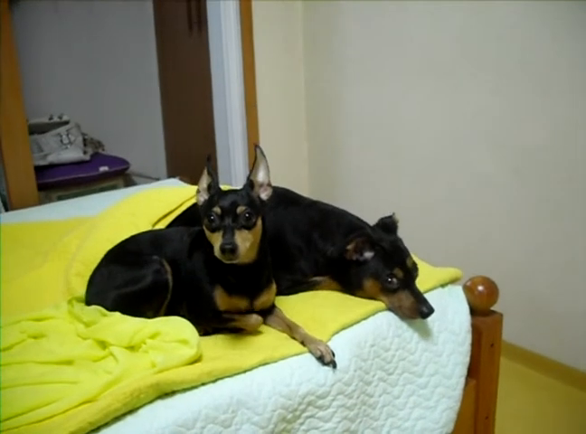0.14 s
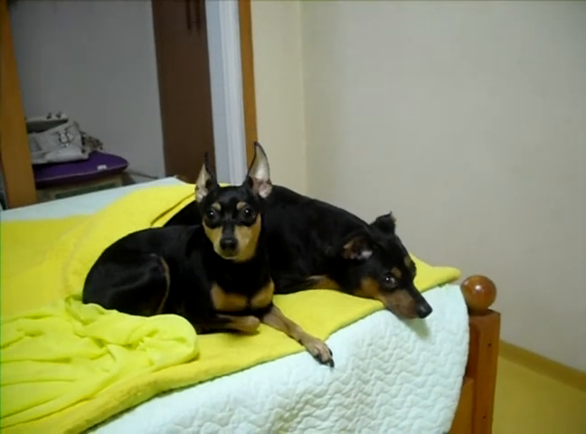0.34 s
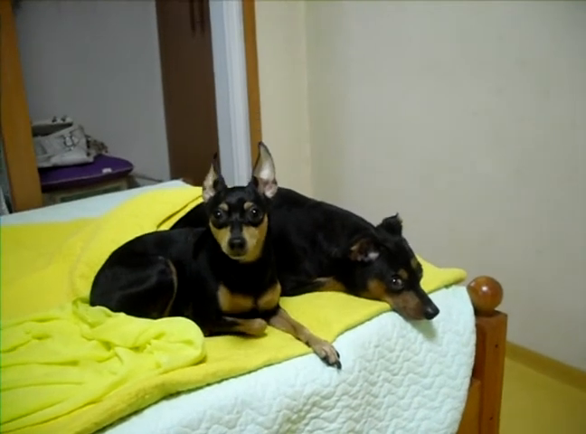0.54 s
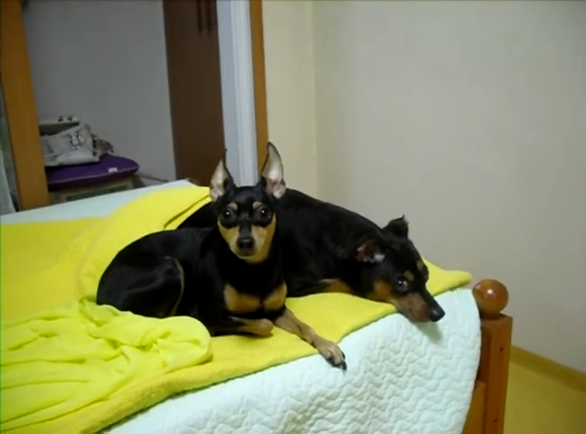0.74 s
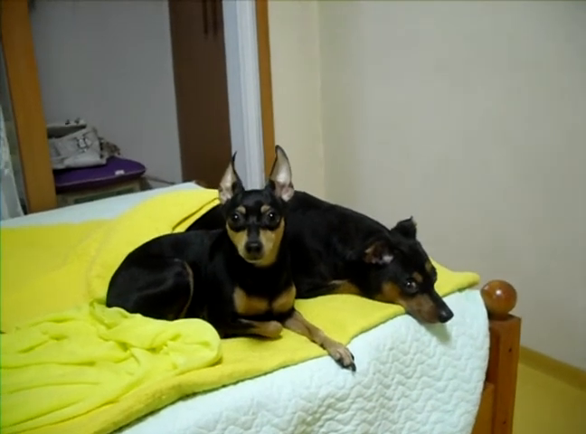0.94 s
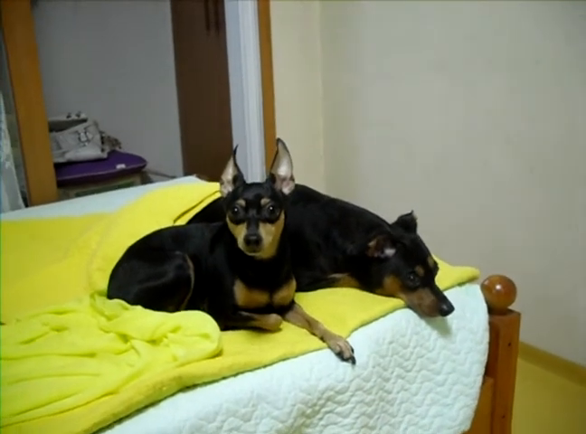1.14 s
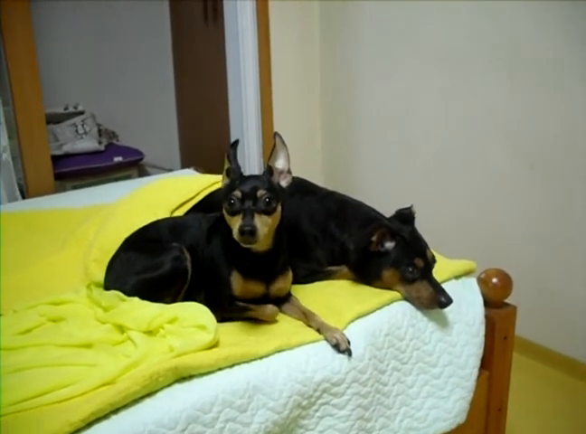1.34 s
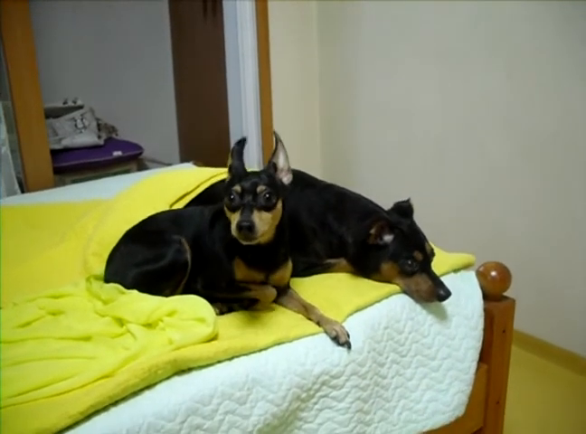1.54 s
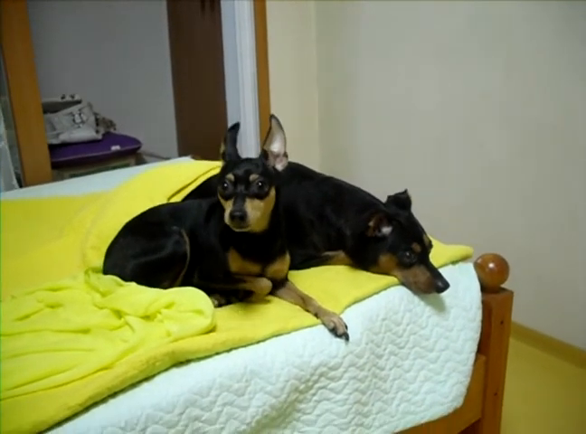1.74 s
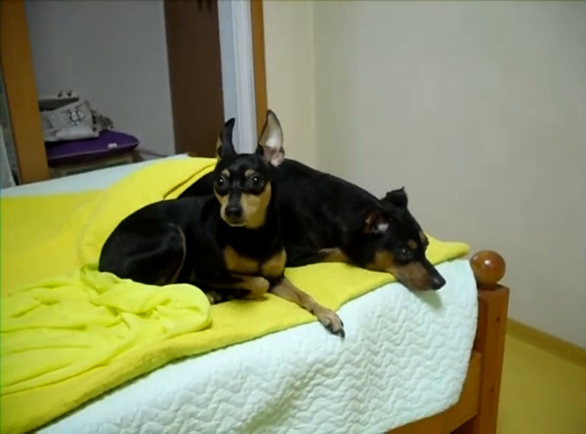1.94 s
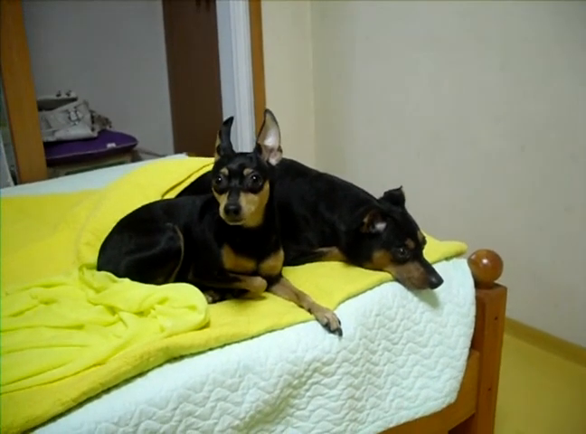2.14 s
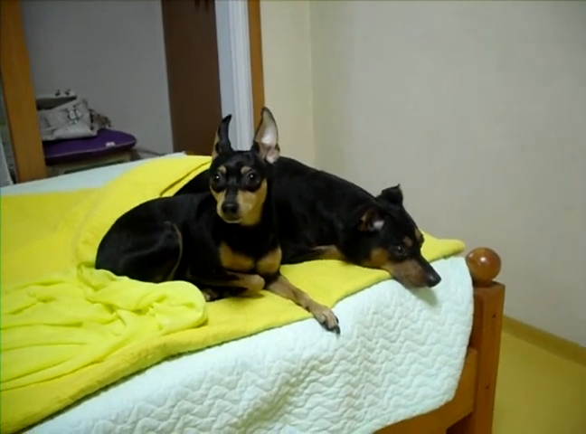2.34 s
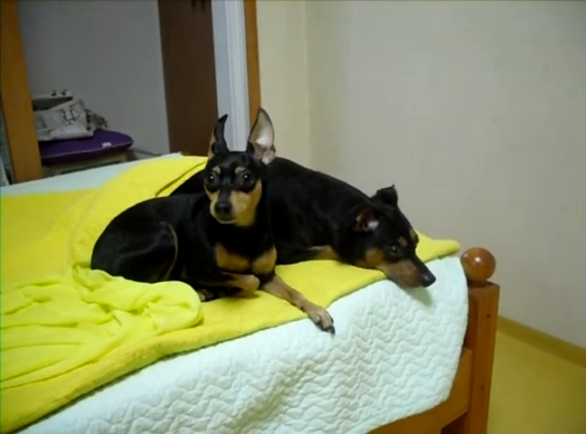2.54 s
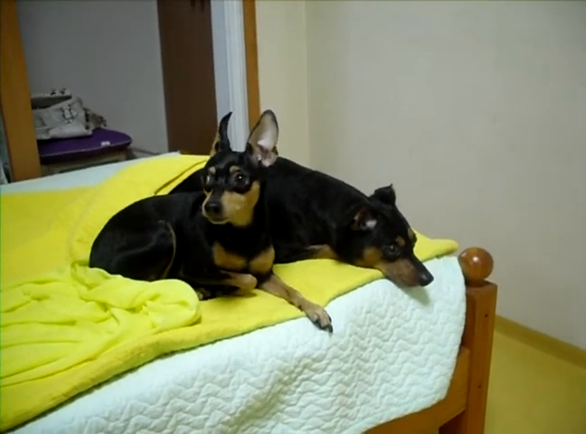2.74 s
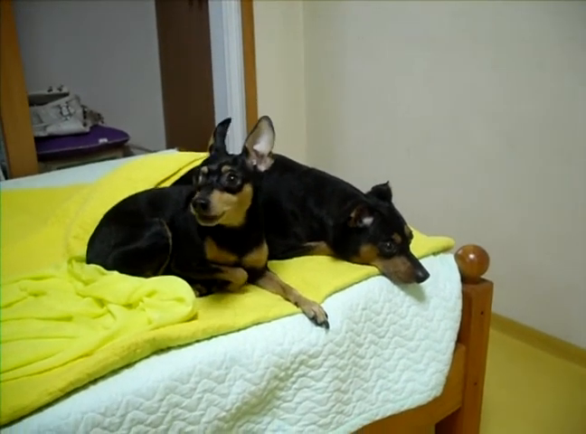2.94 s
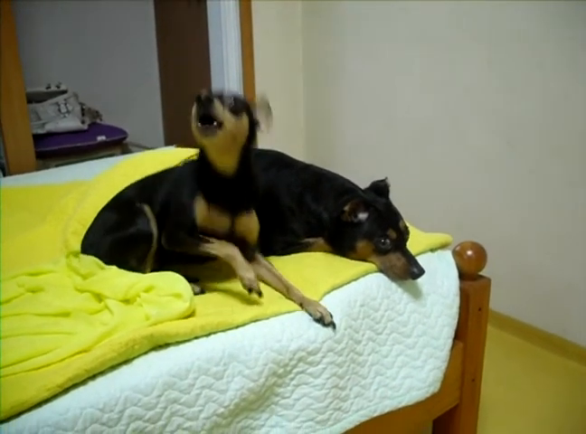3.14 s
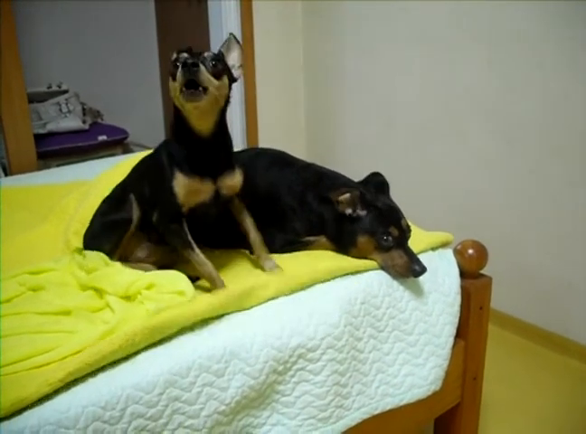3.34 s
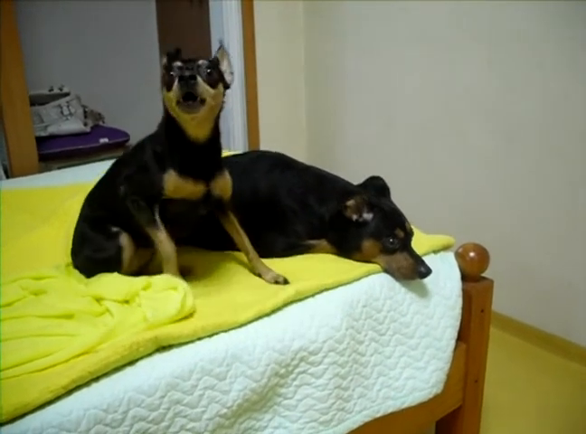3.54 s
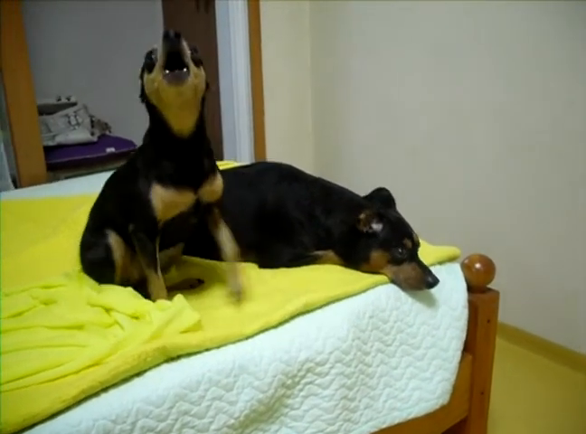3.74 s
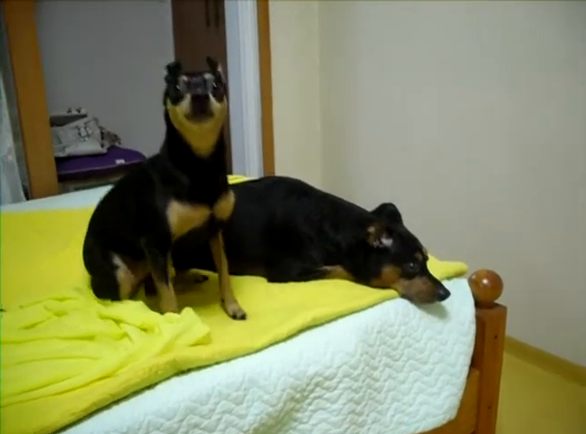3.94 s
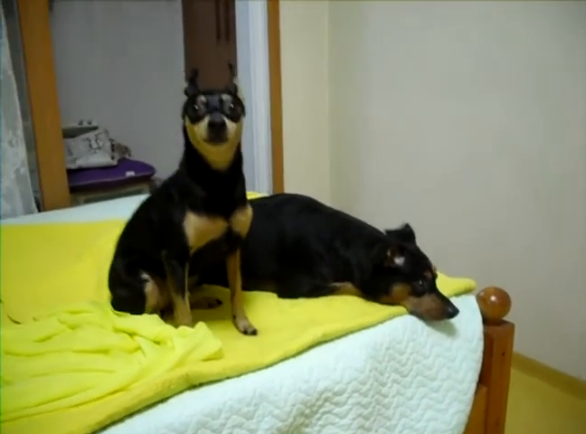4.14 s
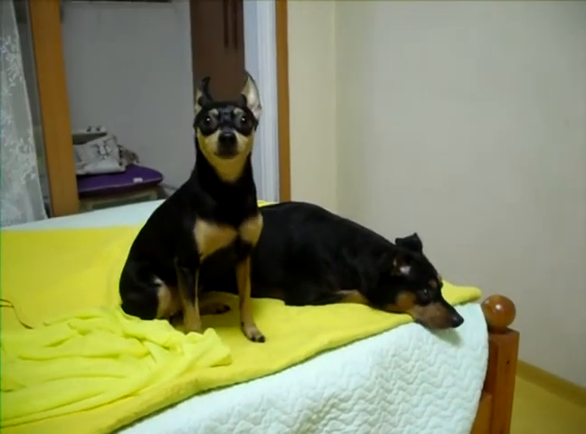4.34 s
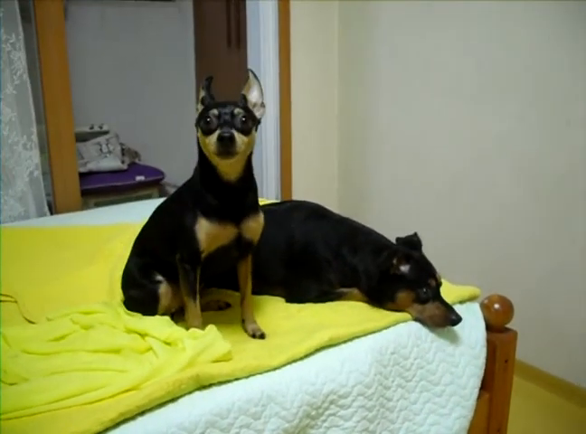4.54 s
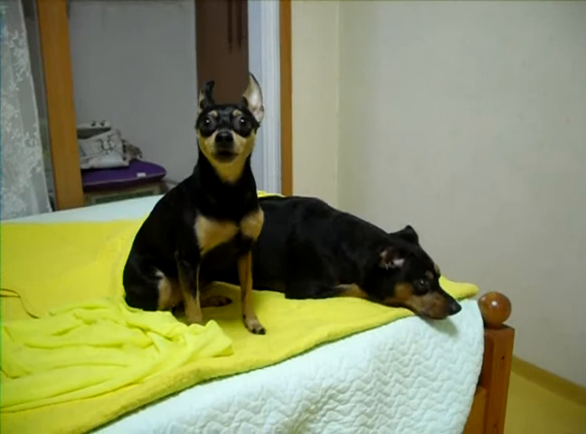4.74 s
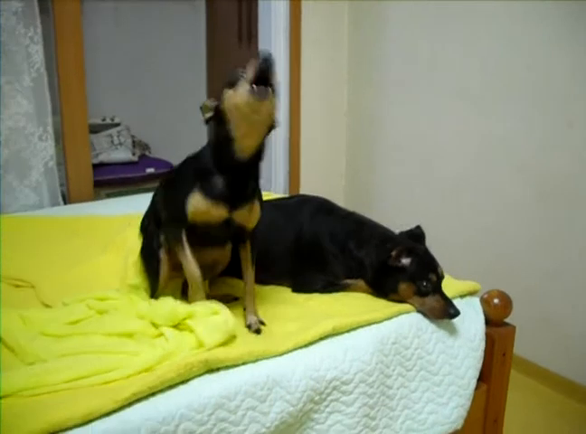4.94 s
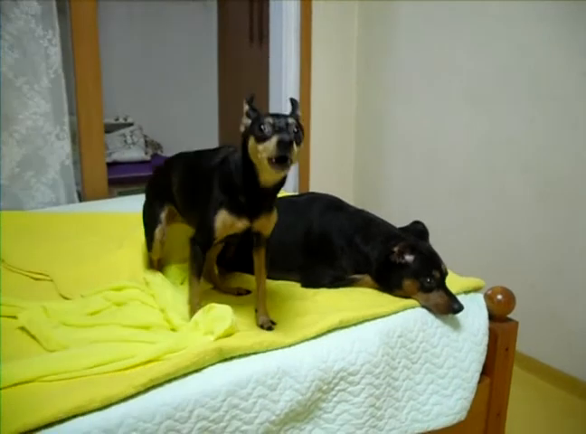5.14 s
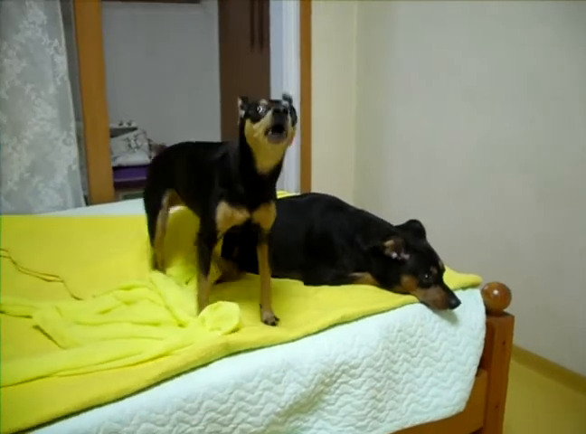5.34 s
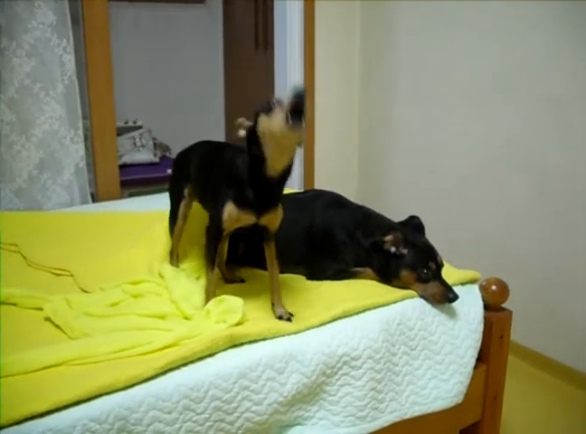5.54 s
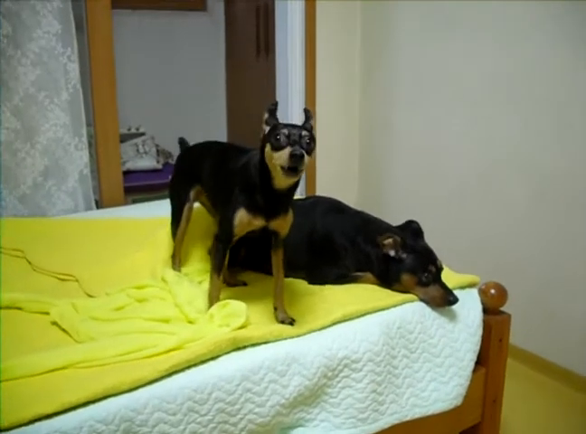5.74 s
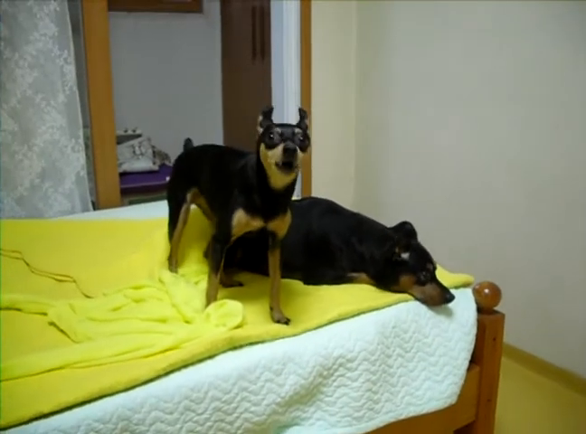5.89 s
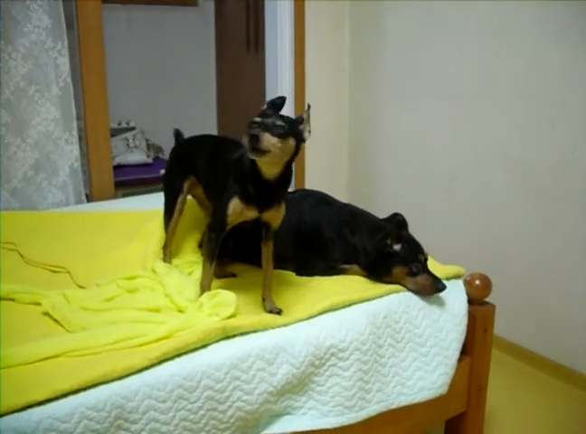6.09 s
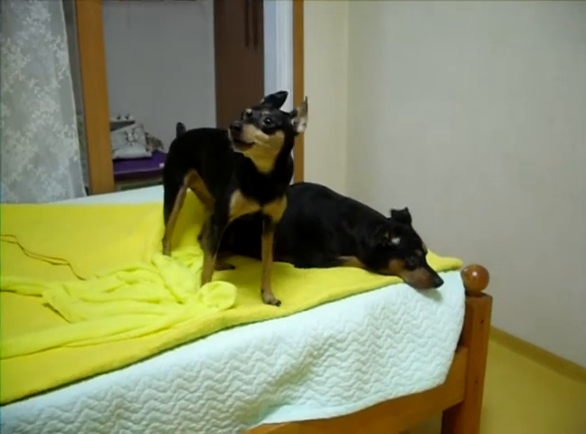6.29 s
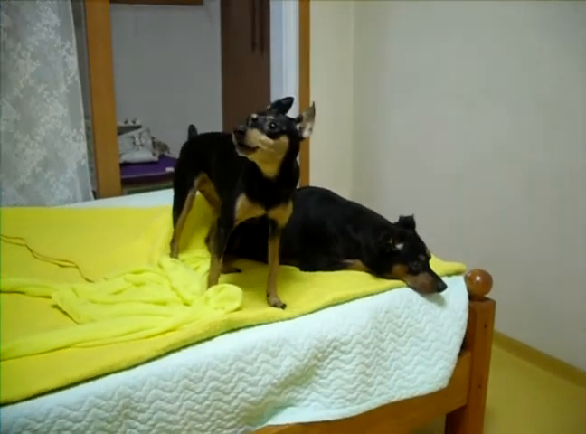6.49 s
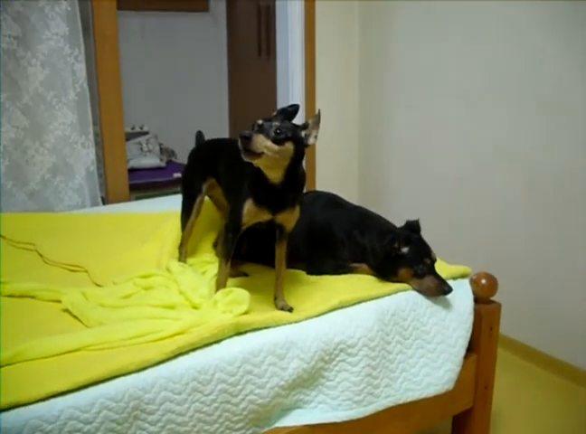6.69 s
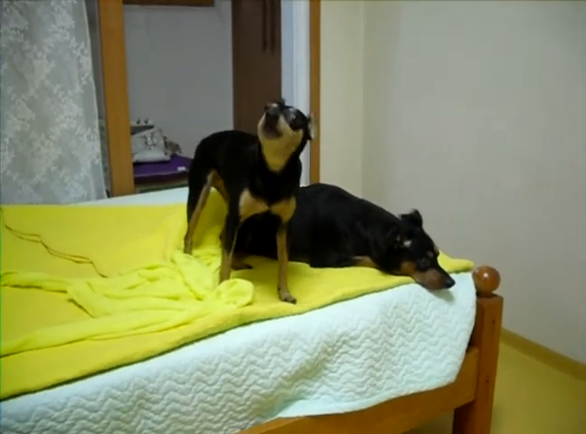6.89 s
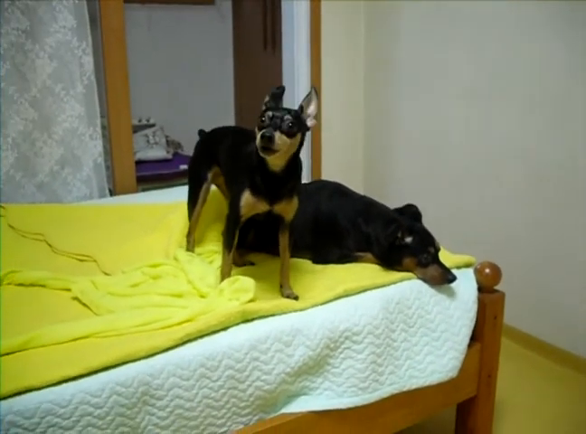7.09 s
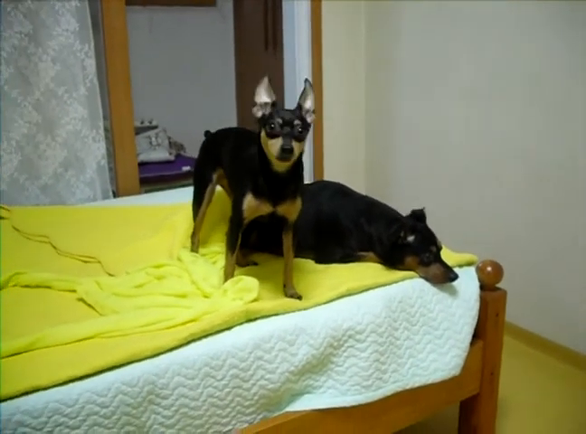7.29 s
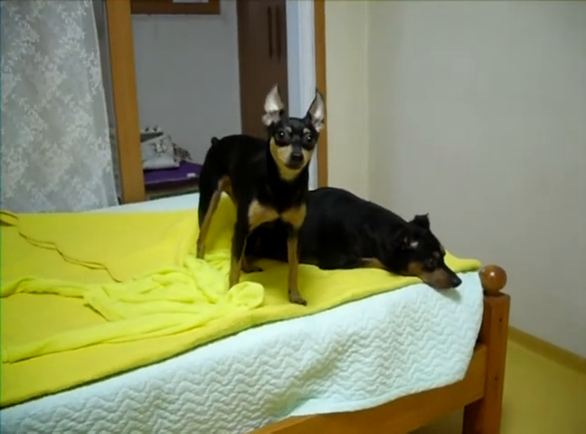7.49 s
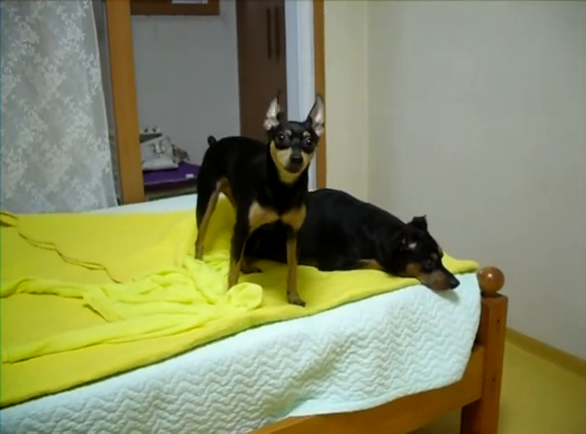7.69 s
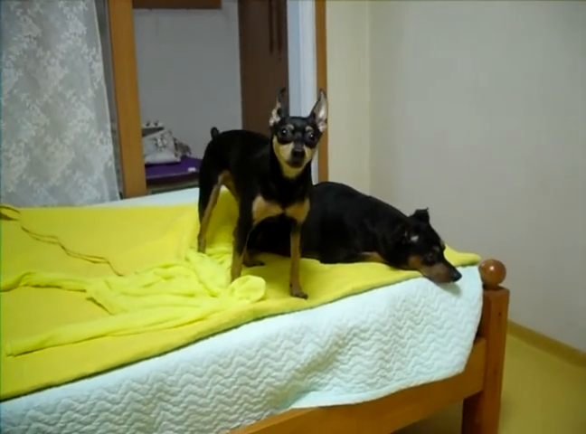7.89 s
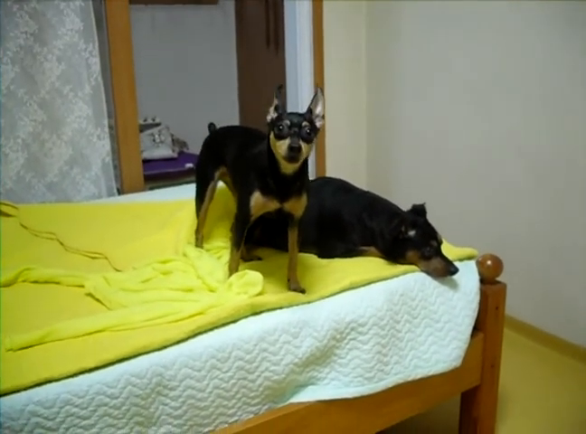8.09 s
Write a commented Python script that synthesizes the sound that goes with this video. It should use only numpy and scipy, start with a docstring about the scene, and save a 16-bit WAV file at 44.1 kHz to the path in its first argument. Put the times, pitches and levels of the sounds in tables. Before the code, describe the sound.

A small dog in a bare bedroom gives one soft, muffled woof over faint hiss and hum. After a pause it breaks into six loud, harsh barks, unevenly spaced, with snorts, grunts and brief yelps around them. A low growl leads into the fifth bark, and the last follows a quiet gap. The loud barks overload a dull-sounding microphone, and the room rings briefly after each.

```python
"""A small dog on a bed in a bare bedroom, over faint hiss and hum.
At 1.3 s, one soft woof through nearly closed lips. From 2.9 s, six loud, harsh barks, with snorts,
grunts and yelps around them; a long, low growl leads into the fifth, and the last comes at 8 s.
The voice is vocal-fold pulses and turbulence ringing the mouth; snorts are air through nose and mouth.
Each loud bark overloads the narrow-band microphone channel, and the room rings briefly after it."""
import sys
import numpy as np
from scipy import signal
from scipy.fft import rfft, irfft, next_fast_len
from scipy.io import wavfile
from scipy.ndimage import uniform_filter1d

SR = 44100
rng = np.random.default_rng(int(sys.argv[2]) if len(sys.argv) > 2 else 0)


def digitize_waveform(pressure):
    """Quantize a signal to 16-bit integers and store it at the path in sys.argv[1].

    Rows of a 2-D input are taken as channels; values are limited to [-1, 1].
    """
    field = np.atleast_2d(pressure).T
    bounded = np.clip(field, -1, 1)
    quanta = np.round(bounded * 32767).astype(np.int16)
    wavfile.write(sys.argv[1], SR, quanta)


N = 359415

# Background spectrum. Each row: frequency in Hz, relative density in dB.
HISS_SPECTRUM = [(20, 7), (38, -0.5), (60, -12), (140, -8), (450, -11.5), (1000, -15), (5000, -22)]
# Bedroom decay. Each row: frequency in Hz, time to fall 60 dB in seconds.
ROOM_T60 = [(150, 0.33), (500, 0.2317), (1200, 0.3422), (2500, 0.2767), (5000, 0.334)]
# Microphone channel response. Each row: frequency in Hz, gain in dB.
CHANNEL_RESPONSE = [(4600, 4), (5200, 0), (5700, -12), (6200, -37.5), (6700, -81)]
# Fixed resonances of nose and throat. Each row: centre in Hz, width in Hz, gain in dB.
NOSE_RESONANCES = [(660, 210, 1.5), (1920, 230, -2), (3194, 1500, -18), (5025, 5400, -12)]
THROAT_RESONANCES = [(2732, 380, -11.5), (3615, 1100, -20.5), (4855, 2100, -17.5)]
# Puffs of air. Each row: start, rise and length in seconds, level in dB, mouth resonance in Hz,
# brightness in dB, whistle in Hz.
SNORT_PUFFS = [(2.765, 0.11, 0.052, -43.5, 1028, -8, 2454), (3.081, 0.058, 0.04, -18.5, 1148, -7, 4902),
               (3.142, 0.0128, 0.0964, -25, 1142, -6, 3010), (3.292, 0.0242, 0.11, -27, 1166, -3.5, 3022),
               (4.601, 0.05, 0.08, -30.5, 1050, -6.5, 4630), (4.623, 0.0144, 0.15, -36.5, 1000, -6, 2557),
               (4.971, 0.0232, 0.1212, -31.5, 1127, -13, 1740),
               (5.162, 0.03, 0.118, -36.5, 1152, -11, 2686), (6.04, 0.032, 0.017, -25, 1078, -1, 2897),
               (6.057, 0.0058, 0.055, -31, 1013, -10, 2596)]
# Grunts, a yelp into a bark, a squeal inside one. Each row: start, rise and length in seconds,
# effort in dB, first pitch in Hz, glide in octaves per second, mouth resonance in Hz, brightness in dB,
# second resonance in Hz, its gain in dB.
VOICED_GLIDES = [(3.33, .08, 0.1514, -32, 232.3, 0.02, 620, -9, 1080, 9.5),
                 (3.519, 0.0308, 0.0755, -24, 270.9, 12.5, 980, -10.5, 2628, -11.5),
                 (3.576, 0.016, 0.0585, -9.5, 779.5, 9.5, 920, 0.5, 2568, -1),
                 (4.829, .025, 0.0249, -8, 2170, -17, 1650, -9.5, 3585, -5.5),
                 (4.951, 0.061, .14, -30.5, 293.4, 0.27, 640, -17, 1260, 12),
                 (5.534, 0.066, 0.0597, -36, 600.1, -0.04, 660, -19, 1162, -5)]
# Course of the growl. Each row: time in seconds, effort in dB, pitch in Hz, mouth resonance in Hz.
GROWL_CURVE = [(5.7, -47, 322.9, 410), (5.78, -43, 325.1, 479), (5.84, -33, 342.5, 581.8),
               (5.915, -40, 362.7, 560.8), (5.96, -44, 237.7, 533), (6.14, -45, 187.2, 531),
               (6.33, -46, 203.4, 524.4), (6.37, -50, 202.5, 485.5), (6.42, -42.5, 178.2, 460),
               (6.62, -44, 190, 516)]
# Course of the woof. Each row: time in seconds, effort in dB, pitch in Hz, mouth resonance in Hz,
# brightness in dB.
WOOF_CURVE = [(1.288, -51, 229.3, 333, -39), (1.311, -19.5, 447.8, 461, -22),
              (1.321, -26.5, 571.3, 570.7, -7.5), (1.329, -17.5, 626, 666, 2),
              (1.341, -16.5, 632.3, 783, -9.5), (1.36, -30, 595, 701, -8.5)]
# Loud barks. Each row: start in seconds; end of attack, widest jaw and end of hold in seconds after it;
# release in seconds; effort in dB; pitch after the attack, at widest jaw and at the end in Hz;
# mouth resonance after the attack and at widest jaw in Hz; ratio of second to mouth resonance;
# roughness, period doubling and clearing from 0 to 1; brightness in dB.
LOUD_BARKS = [(2.863, 0.04108, 0.1206, 0.1389, 0.0712, 3.5, 695.6, 705.4, 584.6, 1171, 1379, 1.972, 0.51, .9, 0.8, -8.5),
              (3.572, 0.04006, 0.0681, 0.10295, 0.1098, 1, 660, 708.3, 608.9, 1054, 1379, 1.78, 0.32, 0.68, 0.27, -8),
              (4.744, .036, 0.13, .156, .05, -6, 645.1, 624.4, 595, 1087, 1247, 1.75, .62, 1, 0.7, -2.5),
              (5.315, .046, 0.13897, 0.1376, 0.079, -5, 930.8, 952.8, 942.5, 1184, 1079, 1.654, .5, 0.52, .3, 1.5),
              (6.612, .056, .113, .164, 0.05, -4.5, 450, 608.4, 401, 964.7, 1158, 1.958, .42, 0.6, 0.13, -4),
              (8.03, .046, .084, 0.1227, 0.0615, -4.5, 479.6, 521.1, 474, 1034, 1049, 1.5, .5, 0.93, 0.03, -1)]


def gain_of(db):
    """Decibels to an amplitude factor."""
    return 10 ** (np.asarray(db) / 20)


def unit_rms(x):
    """Scales to rms 1."""
    return x / np.sqrt(np.mean(x ** 2) + 1e-20)


def lookup(table, hz):
    """Reads a table on a log-frequency axis."""
    table_hz, values = np.transpose(table)
    return np.interp(np.log(hz + 1), np.log(table_hz + 1), values)


def sample_curve(rows):
    """Sample times over a curve's span, and each column at those times."""
    times_s, *columns = np.transpose(rows)
    t = np.arange(times_s[0], times_s[-1], 1 / SR)
    return t, *(np.interp(t, times_s, column) for column in columns)


def add(mix, start_s, sound):
    """Mixes a sound in at start_s."""
    part = mix[round(start_s * SR):][:len(sound)]
    part += sound[:len(part)]


def equalize(x, response):
    """Filters by rows of Hz and dB."""
    size = next_fast_len(len(x) + 4096)
    gain = gain_of(lookup(response, np.fft.rfftfreq(size, 1 / SR)))
    return irfft(rfft(x, size) * gain, size)[:len(x)]


def lowpass(x, hz):
    """Steep band limit."""
    return signal.oaconvolve(x, signal.firwin(255, hz, window=("kaiser", 9), fs=SR), "same")


def wander(size, rate_hz):
    """Gaussian random points, rate_hz a second, joined by straight lines."""
    steps = np.arange(size) * rate_hz / SR
    return np.interp(steps, np.arange(2000), rng.standard_normal(2000))


def resonate(x, hz, width_hz):
    """Steep unity-gain resonance whose centre can move."""
    carrier = np.exp(2j * np.pi * np.cumsum(hz * np.ones(len(x))) / SR)
    pole = np.exp(-np.pi * width_hz / SR)
    baseband = signal.lfilter([(1 - pole) ** 2], [1, -2 * pole, pole * pole], x / carrier)
    return 2 * (carrier * baseband).real


def background(hiss_db=-59, hum_db=-75.5, hum_hz=122.7):
    """Quiet hiss and rumble with a faint wavering hum."""
    hiss = lowpass(equalize(rng.standard_normal(N), HISS_SPECTRUM), hz=5350)
    hum = np.sin(2 * np.pi * np.cumsum(hum_hz + wander(N, rate_hz=54)) / SR)
    return gain_of(hiss_db) * unit_rms(hiss) + gain_of(hum_db) * unit_rms(hum)


def bedroom(x, wet_db):
    """Direct sound plus dense wall reflections, each band decaying at its own rate."""
    slots = np.arange(130, SR // 2, 20)  # one reflection per 20 samples
    taps = np.zeros(SR)
    taps[slots + rng.integers(0, 20, len(slots))] = rng.choice([-1., 1.], len(slots))
    hz, t, spectra = signal.stft(taps, SR, nperseg=256)
    decay = gain_of(-60 * t / lookup(ROOM_T60, hz)[:, None])
    tail = signal.istft(spectra * decay, SR, nperseg=256)[1]
    reflections = signal.fftconvolve(x, tail / np.linalg.norm(tail))[:N]
    wet = gain_of(wet_db)
    return (x + wet * reflections) / np.sqrt(1 + wet ** 2)


def tract(drive, mouth_hz, mouth_width_hz, resonances, bright_db):
    """The mouth resonance plus further ones scaled by bright_db."""
    others = sum(gain_of(db) * resonate(drive, hz, width_hz) for hz, width_hz, db in resonances)
    return resonate(drive, mouth_hz, mouth_width_hz) + gain_of(bright_db) * others


def snort(start_s, rise_s, length_s, level_db, mouth_hz, bright_db, whistle_hz,
          mouth_width_hz=420, whistle_q=5.9, whistle_db=-5.5):
    """Fluttering air rings mouth and nose and whistles faintly at a narrow gap."""
    t = np.arange(0, length_s, 1 / SR)
    air = rng.standard_normal(SR)[:len(t)] * gain_of(3.2 * wander(len(t), rate_hz=240))
    push = np.interp(t, [0, min(rise_s, length_s), length_s], [.2, 1, .25])
    whistle = (whistle_hz, whistle_hz / whistle_q, whistle_db)
    sound = tract(air, mouth_hz, mouth_width_hz, NOSE_RESONANCES + [whistle], bright_db)
    return start_s, gain_of(level_db) * push * unit_rms(sound)


def vocal_folds(pitch_hz, rough, doubling, jitter):
    """Uneven fold pulses mixed with a puff of turbulence each cycle."""
    size = len(pitch_hz)
    cycles = np.cumsum(pitch_hz * (1 + jitter * rough * wander(size, rate_hz=300))) / SR
    orders = np.arange(1, 25)[:, None]
    rolloff = 1 / (1 + (orders * pitch_hz / 3800) ** 6)  # soft closure: little treble
    harmonics = np.cos(2 * np.pi * orders * cycles)
    half_harmonics = np.cos(2 * np.pi * (orders + .5) * cycles)  # strong and weak pulses alternate
    pulses = (rolloff * (harmonics + doubling * half_harmonics)).sum(0)
    shimmer = 1 + rough * wander(size, rate_hz=400)
    pulses *= 2 * np.sqrt(pitch_hz / SR / (1 + doubling ** 2)) * shimmer
    airflow = .25 + np.exp(-(cycles % 1) / .99)
    puffs = unit_rms(airflow * rng.standard_normal(2 * SR)[:size])
    return (1 - rough) * pulses + rough * puffs


def voice(effort_db, pitch_hz, mouth_hz, bright_db, *, rough, doubling, jitter, flutter_db, neck_db,
          mouth_width_hz, second_hz, second_width_hz, second_db):
    """The vocal folds drive throat and mouth; the level flutters around the effort."""
    size = len(pitch_hz)
    drive = vocal_folds(pitch_hz, rough, doubling, jitter)
    # A soft voice hums its fundamental through the neck; a pressed one loses it unless the mouth rings.
    pressed = np.interp(effort_db, [-32, -12], [0, 1]) * np.clip(2 * (mouth_hz / pitch_hz - 1), 0, 1)
    fundamental = resonate(drive, pitch_hz, width_hz=270)
    resonances = THROAT_RESONANCES + [(second_hz, second_width_hz, second_db)]
    sound = tract(drive - pressed * fundamental, mouth_hz, mouth_width_hz, resonances, bright_db)
    sound += gain_of(neck_db) * (1 - pressed) * fundamental
    running_rms = np.sqrt(uniform_filter1d(sound ** 2, size=900) + 1e-12)
    level = gain_of(effort_db + flutter_db * rough * wander(size, rate_hz=130))
    return level * sound / running_rms * signal.windows.tukey(size, .03)


def growl():
    """Fluttering rumble through a nearly shut mouth; brightens as it swells, then drops in pitch."""
    t, effort_db, pitch_hz, mouth_hz = sample_curve(GROWL_CURVE)
    bright_db = -4 + 2 * (effort_db - effort_db.max())
    return t[0], voice(effort_db, pitch_hz, mouth_hz, bright_db,
                       rough=.24, doubling=.074, jitter=.25, flutter_db=9, neck_db=-2,
                       mouth_width_hz=186.6,
                       second_hz=1.822 * mouth_hz, second_width_hz=90, second_db=16.5)


def glide(start_s, rise_s, length_s, effort_db, first_hz, octaves_per_s, mouth_hz, bright_db,
          second_hz, second_db):
    """Grunt, yelp or squeal: a short voiced swell on one straight pitch glide."""
    t = np.arange(0, length_s, 1 / SR)
    swell_db = np.interp(t, [0, min(rise_s, length_s), length_s], [-15, 0, -15])
    pitch_hz = first_hz * 2 ** (octaves_per_s * t)
    return start_s, voice(effort_db + swell_db, pitch_hz, mouth_hz, bright_db,
                          rough=.32, doubling=.076, jitter=.14, flutter_db=9.5, neck_db=-12,
                          mouth_width_hz=230,
                          second_hz=second_hz, second_width_hz=200, second_db=second_db)


def woof():
    """A rising hum behind the lips, which then puff open."""
    t, effort_db, pitch_hz, mouth_hz, bright_db = sample_curve(WOOF_CURVE)
    return t[0], voice(effort_db, pitch_hz, mouth_hz, bright_db,
                       rough=.39, doubling=.18, jitter=.022, flutter_db=6, neck_db=-33.5,
                       mouth_width_hz=159,
                       second_hz=2.104 * mouth_hz, second_width_hz=370, second_db=2.5)


def bark(start_s, attack_s, widest_s, held_s, release_s, effort_db, first_hz, wide_hz, last_hz,
         first_mouth_hz, wide_mouth_hz, second_ratio, rough, doubling, clearing, bright_db):
    """Pitch and mouth resonance scoop up in the attack and sink together as the jaw closes."""
    end_s = held_s + release_s
    t = np.arange(0, end_s, 1 / SR)
    stages_s = [0, attack_s, widest_s, held_s + .4 * release_s]
    pitch_hz = np.interp(t, stages_s, [.48 * first_hz, first_hz, wide_hz, last_hz])
    last_mouth_hz = .959 * wide_mouth_hz * last_hz / wide_hz
    mouth_hz = np.interp(t, stages_s, [.521 * first_mouth_hz, first_mouth_hz, wide_mouth_hz, last_mouth_hz])
    lips_shut = np.clip(1 - t / attack_s, 0, 1) ** 1.03
    # At widest jaw the voice briefly locks into a purer, darker tone that carries better.
    clear = clearing * np.exp(-.5 * ((t - widest_s) / .0208) ** 2)
    fade_db = np.interp(t, [attack_s, held_s, end_s], [0, -5.5, -43.5])
    level_db = effort_db - 40.5 * lips_shut + fade_db + 3.5 * clear
    treble_db = bright_db - 17 * lips_shut - 16.5 * clear
    return start_s, voice(level_db, pitch_hz, mouth_hz, treble_db,
                          rough=rough * (1 - clear), doubling=doubling * (1 - clear),
                          jitter=.11, flutter_db=4, neck_db=-12, mouth_width_hz=355.6,
                          second_hz=second_ratio * mouth_hz, second_width_hz=340, second_db=-4)


def scene():
    """The dog in its room, over the background; mono."""
    dog = np.zeros(N)
    add(dog, *woof())
    add(dog, *growl())
    for source, table in (bark, LOUD_BARKS), (glide, VOICED_GLIDES), (snort, SNORT_PUFFS):
        for row in table:
            add(dog, *source(*row))
    return (bedroom(dog, wet_db=-2.5) + background())[None]


def overload(x, ceiling, knee):
    """Flattens the peaks; a higher knee is harder."""
    return x / (1 + abs(x / ceiling) ** knee) ** (1 / knee)


def record(dry):
    """The input overloads, the channel cuts the treble, and its overshoot clips again into thin fizz."""
    narrow = equalize(overload(dry[0], ceiling=.4604, knee=33), CHANNEL_RESPONSE)
    clipped = np.clip(narrow, -.694, .694)
    fizz_edge = resonate(clipped, hz=9750, width_hz=780)
    return lowpass(clipped + 2 * fizz_edge, hz=15850)[None]


dry = scene()
out = record(dry)
digitize_waveform(out)
```